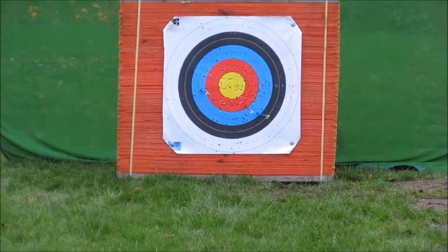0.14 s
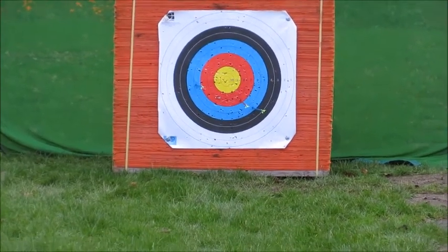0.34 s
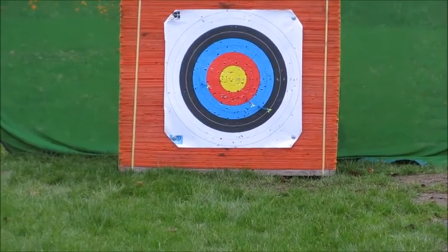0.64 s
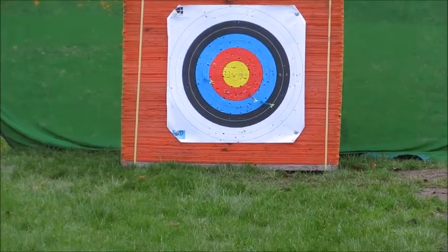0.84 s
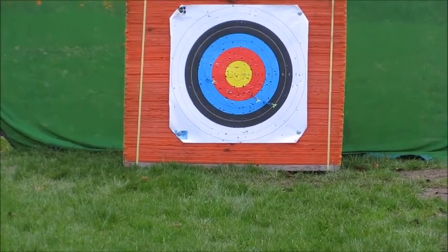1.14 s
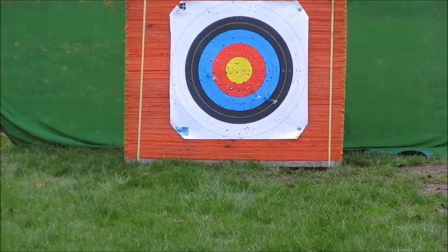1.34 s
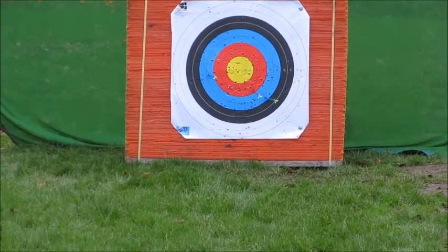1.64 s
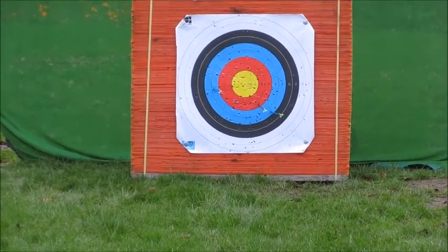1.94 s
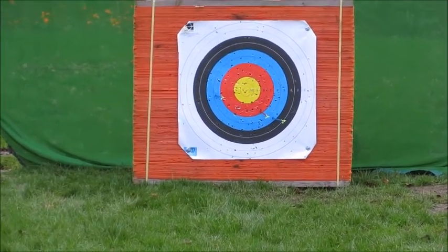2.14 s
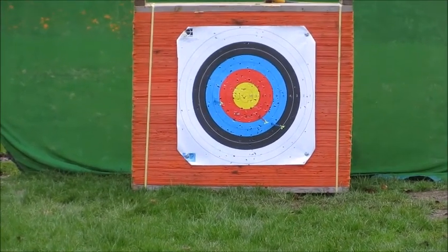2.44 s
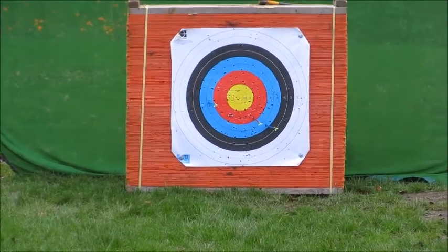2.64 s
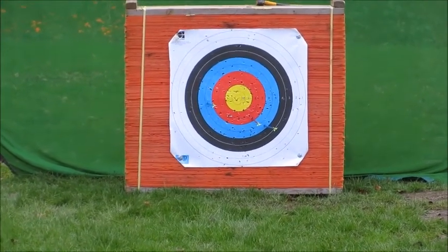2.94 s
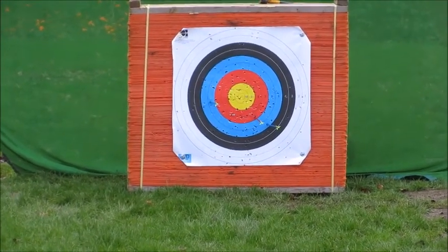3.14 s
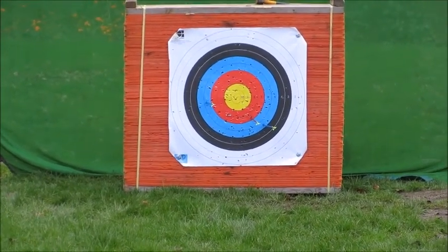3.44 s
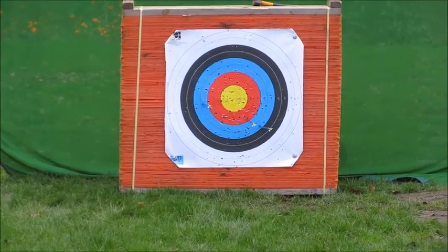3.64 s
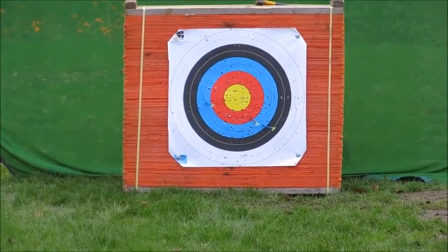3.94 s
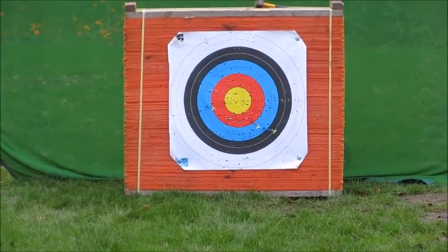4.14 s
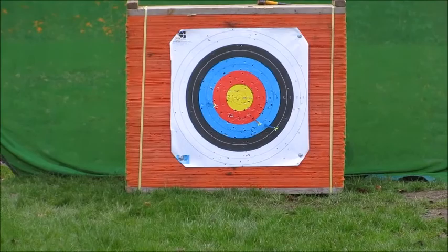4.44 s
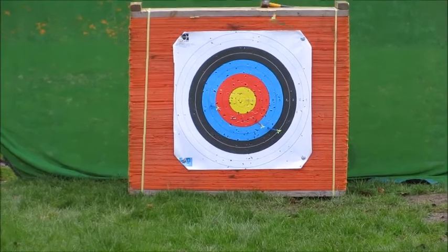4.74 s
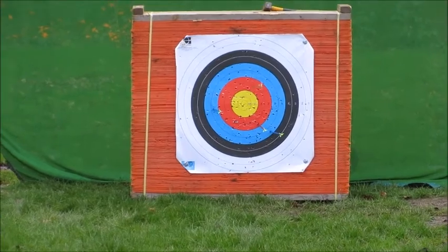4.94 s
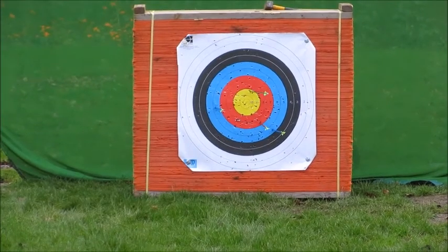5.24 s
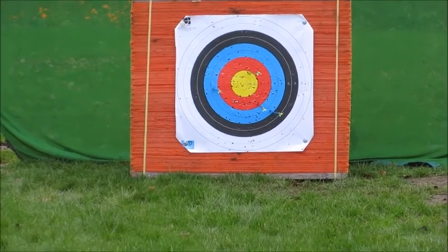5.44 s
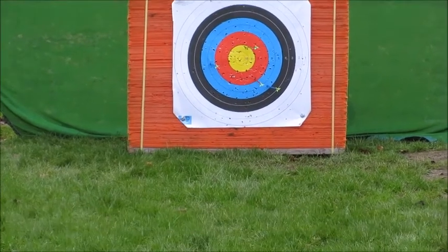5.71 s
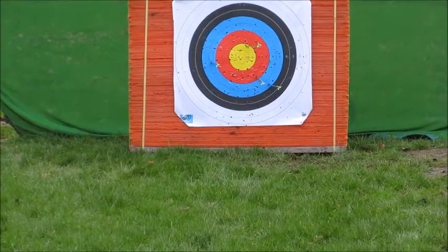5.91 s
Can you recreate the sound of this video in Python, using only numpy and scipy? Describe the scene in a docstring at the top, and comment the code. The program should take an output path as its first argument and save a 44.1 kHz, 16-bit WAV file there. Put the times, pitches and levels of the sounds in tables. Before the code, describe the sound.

At a quiet outdoor archery range with small birds whistling, a bow releases sharply and the arrow hits with an echoing smack.

```python
"""One shot at an outdoor archery range, from a single microphone near the shooting line.
Distant traffic and leaves lie under it all; small birds whistle, and someone shifts beside the
microphone with a rustle and soft knocks. At 4.6 s, close by, an arrow scrapes off the rest and the bow
snaps, rings and rattles. Half a second later the point smacks into the target boss downrange, and
fences and trees throw the smack back. Clothing rustles again as the echoes die."""
import sys
import numpy as np
from scipy import signal
from scipy.fft import rfft, irfft
from scipy.io import wavfile
from scipy.ndimage import uniform_filter1d

SR = 44100
rng = np.random.default_rng(int(sys.argv[2]) if len(sys.argv) > 2 else 0)


def bounce(signal):
    """Save signal as a 16-bit WAV file at the path given by the first command-line argument."""
    frames = np.transpose(np.atleast_2d(signal))
    limited = np.clip(frames, -1, 1)
    pcm = np.round(limited * 32767).astype(np.int16)
    wavfile.write(sys.argv[1], SR, pcm)


N = 267907

# Table levels are relative; the functions set each source's final gain.
# spectrum of distant traffic and leaves: (frequency [Hz], level [dB])
AMBIENCE_COLOUR = [(22, -16), (48, -1.5), (125, -4), (195, -0.5), (265, -4.5), (365, -6), (600, -9.5),
                   (1000, -10.5), (1330, -13), (1620, -13), (1980, -18), (3300, -21), (7000, -26.5),
                   (10900, -32), (15000, -41)]
# slurred notes of far birds: (time [s], length [s], start pitch [Hz], end pitch [Hz], level [dB])
FAR_SLURS = [(0, .14, 3450, 3300, -56.5), (1.47, .27, 4820, 4600, -61.5), (3.43, .1, 6030, 5750, -61),
             (4.045, .035, 4450, 5000, -55), (4.07, .05, 5250, 5850, -56), (4.168, .04, 4400, 3400, -52),
             (4.21, .045, 4450, 3550, -50), (4.19, .39, 3200, 3080, -55.5), (4.39, .09, 4050, 3980, -53)]
# calls of a nearer bird: (time [s], pitch [factor], time constant of the upward step [s],
# low voice's length [s], held note's level [dB], sweeps against that note [dB], hoarseness [0-1])
NEAR_CALLS = [(0.69, 1.015, 0.00702, 0.071, -46.5, -2.5, 0.49),
              (4.507, .992, 0.00296, 0.078, -44, -7.5, 0.18)]
# movements of clothing beside the microphone: (time [s], length [s], level [dB])
RUSTLE_MOVES = [(0, 0.0487, -52.5), (.1, 0.0382, -64), (5.547, 0.125, -62), (5.681, 0.155, -56.5),
                (5.929, 0.094, -55)]
# spectrum of rubbing cloth: (frequency [Hz], level [dB])
CLOTH_COLOUR = [(200, -4), (1500, 3), (2400, 1), (3300, 1.5), (4800, -12), (9000, -8.5), (11000, -21.5),
                (14000, -27)]
# close handling knocks: (time [s], level [dB], t60 [s])
HANDLING_KNOCKS = [(0.189, -35.5, 0.022), (0.1926, -43, 0.0194), (0.1973, -45.5, 0.02863),
                   (2.44, -44, 0.078)]
# bass-heavy spectrum of a knock: (frequency [Hz], level [dB])
HANDLING_COLOUR = [(40, 11), (150, 12.5), (500, -7.5), (1800, 1), (3400, -5.5), (6000, -25), (10000, -17.5),
                   (15000, -41)]
# woody ring of a knock: (frequency [Hz], level [dB], t60 [s])
KNOCK_MODES = [(1250, -3.5, 0.0104), (1850, -1.5, .008), (2370, -2.5, 0.0089)]
# small dry ticks: (time [s], level [dB])
HANDLING_TICKS = [(2.4451, -40.5), (2.449, -44.5)]
# ring of the shaft sliding off the rest: (frequency [Hz], level [dB], t60 [s])
SHAFT_MODES = [(3337, 6.5, 0.027), (5010, -9, 0.019), (5920, -17, 0.0203), (7590, -11, 0.0258),
               (10529, -19.5, 0.02065)]
# thud of the limbs: (frequency [Hz], level [dB], t60 [s])
LIMB_MODES = [(111, -16, 0.049), (379, 1, 0.0224), (543, -2, 0.01553), (756, -13.5, 0.0186),
              (1165, -7.5, 0.016)]
# the string slapping the bow: (time [s], level [dB])
STRING_SLAPS = [(4.6195, -15.5), (4.6212, -15)]
# spectrum of hard contacts on the bow: (frequency [Hz], level [dB])
CONTACT_COLOUR = [(60, -9.5), (400, -7.5), (850, -4), (1500, -3), (4500, 0.5), (11000, 2.5), (15000, -10)]
# ring of riser and limbs, some modes slow to build: (frequency [Hz], level [dB], t60 [s], rise [s])
BOW_MODES = [(1145.5, -34, 0.153, 0.023), (1511.2, -36.5, 0.125, .001), (2428.4, -42.5, 0.236, .002),
             (2958, -23, 0.142, 0.035), (3423, -37.5, 0.175, .003), (3566.5, -44.5, 0.1832, .002),
             (3930, -23.5, 0.047, .004), (4438, -22.5, 0.044, 0.0038), (5046, -37.5, 0.138, 0.001896),
             (5980, -37, .09, .002), (6590, -40, 0.11, 0.001898), (6810, -45, .18, .002),
             (7500, -35.5, .11, .002), (8402, -40.5, .09, .002), (11450, -38, .03, .002)]
# ring of a small loose fitting: (frequency [Hz], level [dB], t60 [s])
FITTING_MODES = [(3510, -6, 0.0078), (3940, -5.5, 0.0079), (4453, 1.5, 0.0087), (5040, -3, 0.0062),
                 (6588, 0, 0.0047)]
# spectrum of the scatter round the shooting line: (frequency [Hz], level [dB])
SCATTER_COLOUR = [(60, -13), (400, -3.5), (800, 2), (1200, 5), (2000, 4), (4000, -1.5), (5000, -3),
                  (8000, -2), (12000, -11.5), (15000, -6.5)]
# target face and boss under the arrow's point: (frequency [Hz], level [dB], t60 [s])
FACE_MODES = [(485.6, -22, 0.0212), (756.4, -39, 0.0214), (1195, -20.5, 0.0164), (1516, -29.5, 0.016),
              (1711, -16, 0.0167), (3294.9, -10.5, 0.005892), (3780, -8, 0.0042), (5530, -6, 0.00156),
              (7581, -23.5, 0.00157), (9235, -19.5, 0.001722)]
# ring of the shaft once stuck: (frequency [Hz], level [dB], t60 [s])
STUCK_SHAFT_MODES = [(2314, -19, 0.008997), (2706.4, -18, 0.0097), (5813, -29, 0.0041)]
# lingering hum of arrow and boss: (frequency [Hz], level [dB], t60 [s])
HUM_MODES = [(223.4, -39.5, 0.323), (334, -44.5, 0.25), (475.7, -34.5, 0.302), (752.3, -42, 0.415),
             (1004, -49.5, 0.55), (1484, -50.5, .35), (1620, -50, .33), (2681, -43.5, 0.32),
             (2784, -46.5, 0.67), (2852, -45.5, 0.46), (4030, -51.5, .2)]
# the smack's paths back to the microphone: (delay [s], level [dB], rise [s], t60 [s], treble edge [Hz])
RANGE_ECHOES = [(.005, -13.5, 0.0028, 0.34, 3470), (.031, -22.5, 0.002037, 0.154, 5600),
                (.076, -19.5, 0.014, 0.123, 2800), (.03, -22.5, 0.054, 0.84, 3580)]
# spectrum of the echo off a far wall: (frequency [Hz], level [dB])
FAR_WALL_COLOUR = [(500, -21), (2000, -9.5), (2800, 4), (3600, -3.5), (5000, -21), (12000, -34.5)]
# shudder of the wooden stand: (frequency [Hz], level [dB])
STAND_COLOUR = [(30, -20.5), (80, -2), (170, 1), (300, -5), (500, -8.5), (650, -7.5), (1200, -6),
                (4000, -55)]
# the whole boss rocking on its stand: (frequency [Hz], level [dB], t60 [s])
ROCKING_MODES = [(79.59, -14, 0.1147), (125, -15.5, 0.047), (166, -1, 0.027), (290, -9, 0.017)]
# that thump, back from the backstop: (frequency [Hz], level [dB], t60 [s])
BACKSTOP_MODES = [(78.9, -4, 0.26), (166.5, 1, 0.111)]

# the arrow slides, the limbs stop, a fitting buzzes, the arrow lands
SLIDE_S, STOP_S, BUZZ_S, HIT_S = 4.5935, 4.6118, 4.6257, 5.0867
SECOND = np.arange(SR) / SR  # time axis of one event [s]


def amp(db):
    """Decibels to gain."""
    return 10 ** (np.asarray(db) / 20)


def add(track, s, sound):
    """Mix a sound into the track from time s on."""
    i = max(int(round(s * SR)), 0)
    track[i:i + len(sound)] += sound[:N - i]


def through(x, response):
    """Pass a sound through a body or a space."""
    return signal.fftconvolve(x, response)[:len(x)]


def unit(x):
    """Scale to unit energy."""
    return x / np.sqrt(np.sum(x ** 2))


def lowpass(x, hz, order=2):
    """Roll off the treble."""
    return signal.sosfilt(signal.butter(order, hz, fs=SR, output="sos"), x)


def highpass(x, hz, order=2):
    """Roll off the bass."""
    return signal.sosfilt(signal.butter(order, hz, "high", fs=SR, output="sos"), x)


def notch(x, hz, width_hz):
    """Take a band out."""
    return signal.lfilter(*signal.iirnotch(hz, hz / width_hz, fs=SR), x)


def tint(colour, size=4096):
    """Minimum-phase, unit-energy response with the given spectrum."""
    hz, db = np.transpose(colour)
    bins_hz = np.arange(size // 2 + 1) * SR / size
    log_gain = np.log(amp(np.interp(np.log(bins_hz + 1), np.log(hz), db)))
    cepstrum = irfft(log_gain)[:size // 2]
    return unit(irfft(np.exp(rfft(2 * cepstrum, size))))


def fade(t60):
    """One second of exponential decay."""
    return amp(-60 * SECOND / t60)


def swell(x, rise):
    """Let a one-second sound build up with time constant rise [s]."""
    return x * (1 - np.exp(-SECOND / rise))


def ring(modes):
    """A struck body: each mode is a dying sine."""
    return sum(amp(db) * fade(t60) * np.sin(2 * np.pi * hz * SECOND) for hz, db, t60 in modes)


def burst(rise, t60):
    """A cloud of tiny contacts or reflections that builds up and dies away."""
    return swell(rng.standard_normal(SR) * fade(t60), rise)


def contact(db, t60, edge_hz):
    """One hard part striking another."""
    return amp(db) * lowpass(burst(rise=0.0002, t60=t60), edge_hz)


def wander(rate_hz):
    """A random drift with a spread near 1."""
    hold = int(SR / rate_hz)
    steps = np.repeat(rng.standard_normal(N // hold + 1), hold)
    return uniform_filter1d(steps, hold)[:N]


def traffic_and_leaves(level_db=-49):
    """Far traffic whose rumble wavers, under an even hiss of leaves."""
    colour = tint(AMBIENCE_COLOUR)
    noise = signal.fftconvolve(rng.standard_normal(N + len(colour) - 1), colour, "valid")
    rumble = lowpass(noise, hz=400.9, order=1)
    wavering = rumble * (amp(1.27 * wander(rate_hz=6.97)) - 1)
    drift_db = np.interp(np.arange(N) / SR, [0, 1.2, 3, 6], [-0.15, 0.24, 0.12, -0.43])
    return amp(level_db + drift_db) * (noise + wavering)


def whistle(hz, db):
    """A bird's note: a sine on a moving pitch, fading in and out."""
    return amp(db) * np.sin(2 * np.pi * np.cumsum(hz) / SR) * signal.windows.tukey(len(hz), 0.36)


def birds():
    """Faint slurs far off and two nearer calls; the far birds carry more echo from the trees."""
    near, far = np.zeros((2, N))
    for s, pitch, rise, length, db, sweep_db, hoarse in NEAR_CALLS:
        add(near, s, amp(db) * rising_call(pitch, rise, length, sweep_db, hoarse))
    for s, length, start_hz, end_hz, db in FAR_SLURS:
        add(far, s, whistle(np.linspace(start_hz, end_hz, int(length * SR)), db))
    far *= 1 + 1.33 * wander(rate_hz=500)  # a hoarse flutter widens the notes
    trees = unit(burst(rise=0.0049, t60=0.75))
    return near + amp(-9.5) * far + through(amp(-7.5) * near + amp(-11.5) * far, trees)


def clothing(attack_s=0.0061, release_s=0.0323):
    """Cloth rubs beside the microphone; each movement builds up, holds and dies away."""
    movement = np.zeros(N)
    for s, length, db in RUSTLE_MOVES:
        held = np.exp(-np.maximum(SECOND - length, 0) / release_s)
        add(movement, s, amp(db) * swell(held, attack_s))
    friction = rng.standard_normal(N) * movement * amp(2.0 * wander(rate_hz=72))
    return through(friction, tint(CLOTH_COLOUR))


def handling():
    """Soft woody knocks and small dry ticks, right by the microphone."""
    knocks, rings, ticks = np.zeros((3, N))
    for s, db, t60 in HANDLING_KNOCKS:
        add(knocks, s, amp(db) * burst(rise=0.0005, t60=t60))
        add(rings, s, amp(db - 4.0) * ring(KNOCK_MODES))
    for s, db in HANDLING_TICKS:
        add(ticks, s, contact(db, t60=0.00833, edge_hz=9500))
    return through(knocks, tint(HANDLING_COLOUR)) + rings + ticks


def waver(hz, depth):
    """Make a bird's pitch quiver, by about 1.8 % for each unit of depth."""
    return hz * (1 + depth * 0.0181 * wander(rate_hz=419.2)[:len(hz)])


def rising_call(pitch, rise, length, sweep_db, hoarse, step_s=0.018):
    """The nearer bird's two voices: a rough high flick, then a low whistle that steps up and steadies."""
    out = np.zeros(SR)
    flick_hz = pitch * np.linspace(4500, 6280, int(0.025 * SR))
    add(out, 0, whistle(waver(flick_hz, depth=2.68), sweep_db - 2.5))
    t = SECOND[:int(length * SR)]
    slack = (1 - np.tanh((t - step_s) / rise / 2)) / 2  # falls to 0 as the held pitch is reached
    low_hz = pitch * (4267 + (2750 - 4267) * slack)
    add(out, 0.009, whistle(waver(low_hz, depth=hoarse + slack), sweep_db * slack))
    return out * (1 + hoarse * wander(rate_hz=800)[:SR])


def arrow_slide():
    """The shaft scrapes over the rest and rings with the friction."""
    scrape = np.zeros(N)
    zip_peak = np.exp(-((SECOND - 0.007) / 0.00324) ** 2)
    add(scrape, SLIDE_S, rng.standard_normal(SR) * (zip_peak + amp(-6.0) * fade(t60=0.28)))
    return amp(-32.5) * through(scrape, unit(ring(SHAFT_MODES))) + amp(-30.5) * lowpass(scrape, hz=6500)


def bow_snap(rattle_s=4.6238, gap_s=0.0025):
    """The limbs clack, the string slaps, and the fittings bounce, ever weaker and more smeared."""
    hits = np.zeros(N)
    add(hits, STOP_S + 0.001506, contact(db=-21.5, t60=0.0236, edge_hz=5500))
    for s, db in STRING_SLAPS:
        add(hits, s, contact(db, t60=0.00775, edge_hz=14800))
    for k in range(5):
        add(hits, rattle_s + k * gap_s, contact(db=-23 - 2 * k, t60=0.012 + 0.006 * k, edge_hz=9700))
    return amp(0.45) * through(hits, tint(CONTACT_COLOUR))


def bow_ring():
    """The first slap sets the whole bow ringing, unsteadily, as it kicks in the hand."""
    out = np.zeros(N)
    for hz, db, t60, rise in BOW_MODES:
        mode = swell(ring([(hz, db, t60)]), rise)
        add(out, STRING_SLAPS[0][0], mode * amp(2.15 * wander(rate_hz=114.76)[:SR]))
    return out


def fitting_buzz(rate_hz=560, t60=0.046, count=9, jitter_s=0.00012):
    """A loose fitting chatters against the bow, a little unevenly, and dies away."""
    taps = np.zeros(N)
    for k, (late, strength) in enumerate(rng.standard_normal((count, 2))):
        s = k / rate_hz
        add(taps, s + jitter_s * late, amp([1.5 * strength - 60 * s / t60]))
    return through(taps, ring(FITTING_MODES))


def bow_shot():
    """The release from close by, with its scatter round the shooting line and one wall echo."""
    direct = arrow_slide() + bow_snap()
    ringing = bow_ring()
    add(direct, BUZZ_S, amp(-22.5) * fitting_buzz())
    # the limbs take a few milliseconds to stop, so their thud swells before it dies
    thud = ring(LIMB_MODES) * (1 - np.exp(-(SECOND / 0.00363) ** 2))
    add(direct, STOP_S, amp(-9) * thud)
    string_whoosh = highpass(lowpass(burst(rise=0.0036, t60=0.077), hz=896.5), hz=400)
    add(direct, SLIDE_S, amp(-19) * string_whoosh)
    # grass and leaves swallow the scattered treble sooner than the bass
    scatter = lowpass(unit(burst(rise=0.004, t60=0.592)), hz=3200)
    scatter += highpass(unit(burst(rise=0.0045, t60=0.436)), hz=3200)
    around = amp(-10) * through(through(direct + amp(-15.5) * ringing, scatter), tint(SCATTER_COLOUR))
    add(around, 0.068, amp(-21.5) * lowpass(direct, hz=4700, order=4))  # off the wall
    return direct + ringing + around


def face_smack():
    """The point punches the target face in, and the face springs back."""
    face = lowpass(ring(FACE_MODES), hz=11600, order=4)
    face = highpass(face, hz=372.76, order=4)  # a small patch radiates little bass
    smack = np.zeros(N)
    add(smack, 0, -amp(-4.0) * face)
    add(smack, 0.000455, face)
    add(smack, 0.0019, amp(-16.5) * lowpass(face, hz=4500))  # the shaft jerks deeper before it sticks
    return notch(smack[:SR], hz=872, width_hz=315)  # a gap between low and middle modes sounds hollow


def arrow_hit():
    """Downrange the arrow smacks home, shaft and boss hum on, and the range answers."""
    out = np.zeros(N)
    smack = face_smack()
    shaft = highpass(ring(STUCK_SHAFT_MODES), hz=900)
    add(out, HIT_S, amp(-0.21) * smack)
    add(out, HIT_S + 0.00095202, amp(-3.5) * shaft)
    add(out, HIT_S, swell(ring(HUM_MODES), rise=0.0188))
    add(out, HIT_S, amp(-33) * lowpass(burst(rise=0.00056, t60=0.077), hz=7500))  # crushed packing
    # netting, fences and trees scatter the smack and the shaft's ring; grass takes off the treble
    radiated = smack + amp(2.5) * shaft
    for delay, db, rise, t60, edge_hz in RANGE_ECHOES:
        echo = through(radiated, unit(burst(rise, t60)))
        add(out, HIT_S + delay, amp(db) * lowpass(echo, edge_hz))
    add(out, HIT_S + 0.2495, amp(-40.0) * through(radiated, tint(FAR_WALL_COLOUR)))
    return out


def boss_thump():
    """The heavy boss rocks into its wooden stand, which clicks and shudders; the backstop echoes it."""
    click, thump = np.zeros((2, N))
    add(click, HIT_S + 0.013, contact(db=-26.5, t60=0.00813, edge_hz=5000))
    shudder = through(burst(rise=0.0029, t60=0.363), tint(STAND_COLOUR))
    add(thump, HIT_S + 0.003964, amp(-35) * shudder)
    add(thump, HIT_S + 0.01263, -amp(-22.0) * ring(ROCKING_MODES))
    add(thump, HIT_S + 0.0765, -amp(-34.5) * ring(BACKSTOP_MODES))
    return click + highpass(thump, hz=52)


def scene():
    """The shot and its surroundings as they reach one microphone."""
    shot = bow_shot() + arrow_hit() + boss_thump()
    return (shot + birds() + handling() + clothing() + traffic_and_leaves())[None]


def record(dry):
    """The recorder rounds the very highest peak and cuts the top of the band."""
    ceiling, top_hz = 0.92, 15100
    rounded = dry / (1 + (dry / ceiling) ** 8) ** (1 / 8)
    return signal.sosfilt(signal.ellip(10, 0.1, 80, top_hz, fs=SR, output="sos"), rounded)


dry = scene()
out = record(dry)
bounce(out)
```